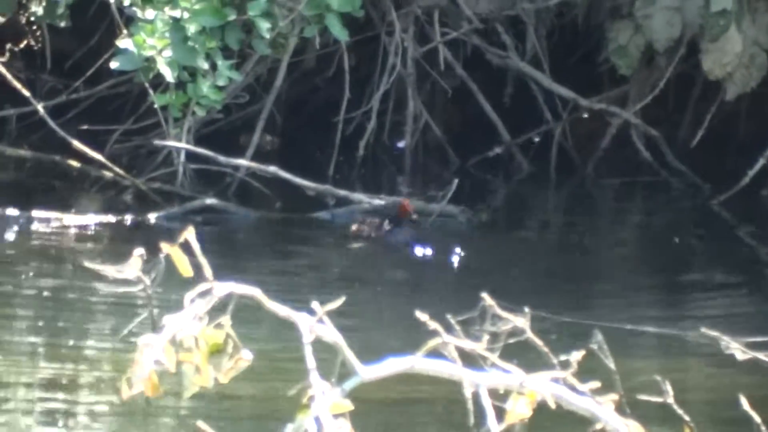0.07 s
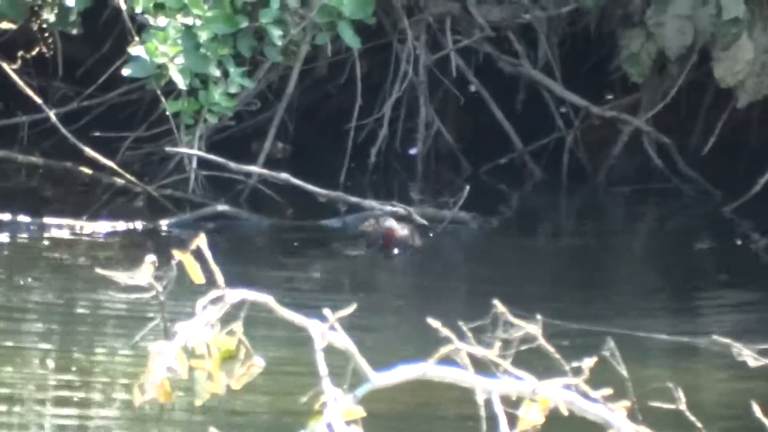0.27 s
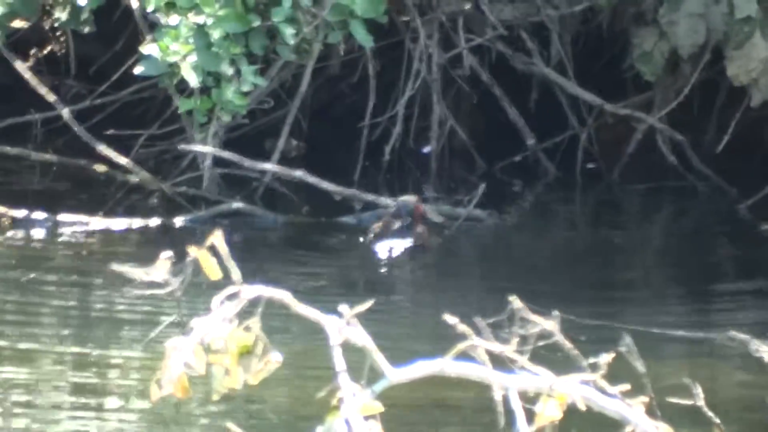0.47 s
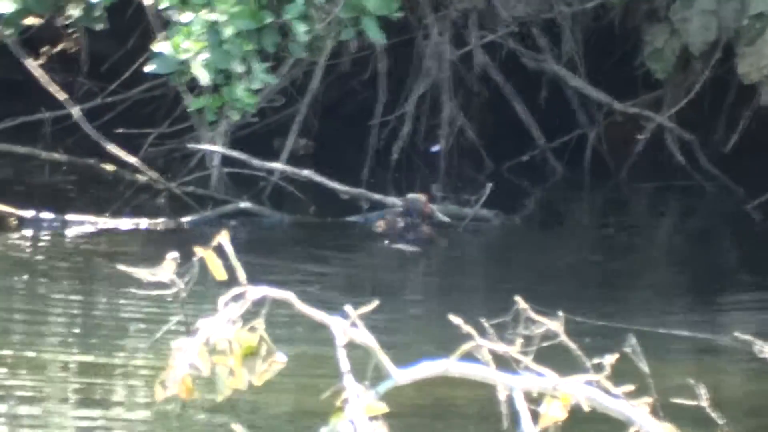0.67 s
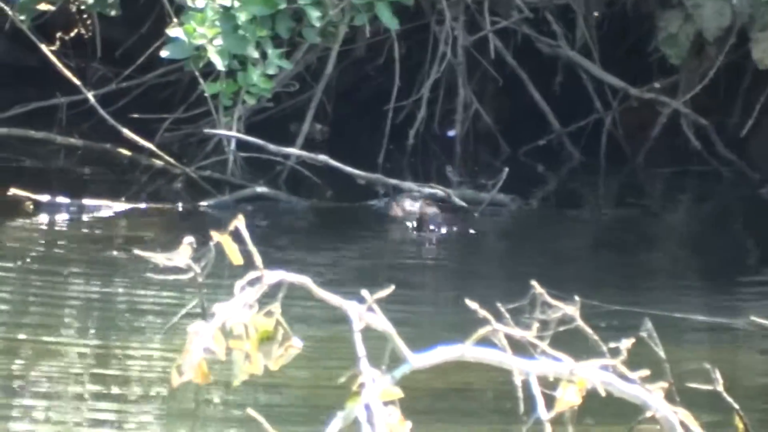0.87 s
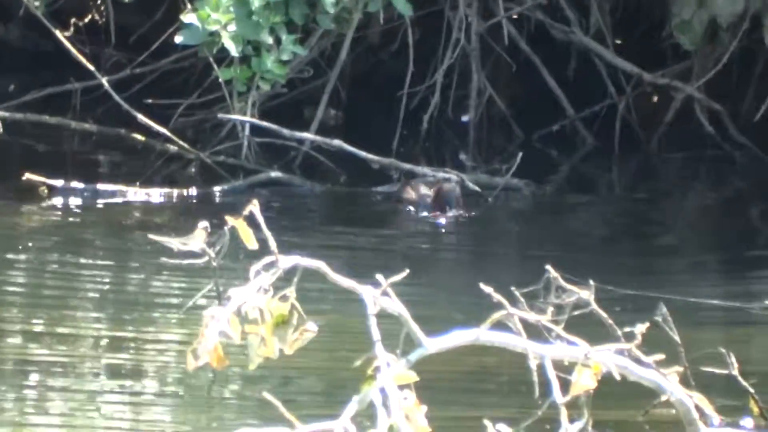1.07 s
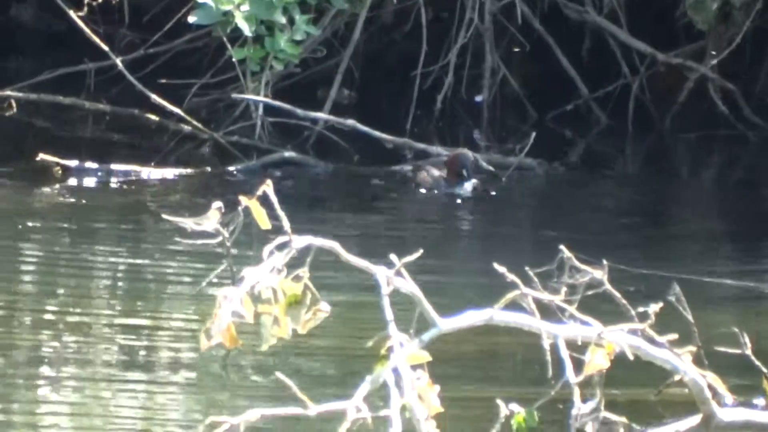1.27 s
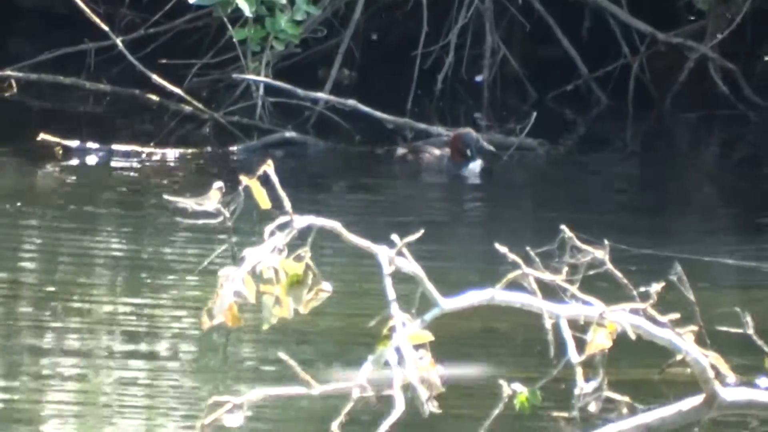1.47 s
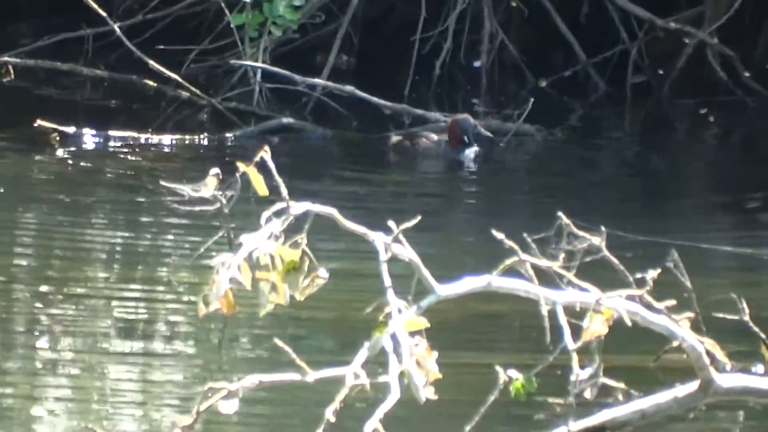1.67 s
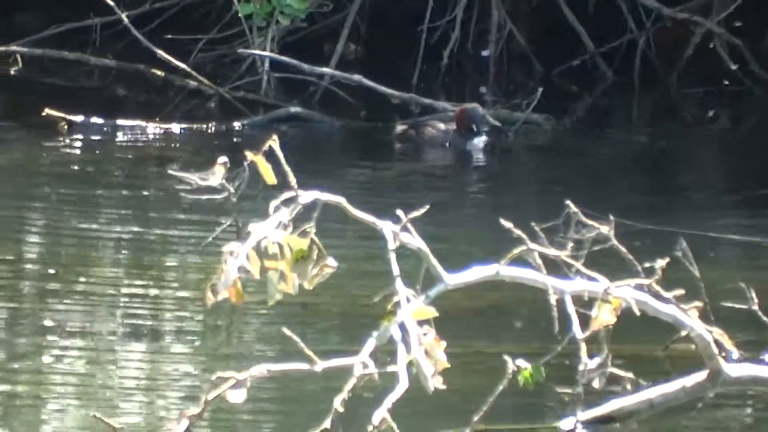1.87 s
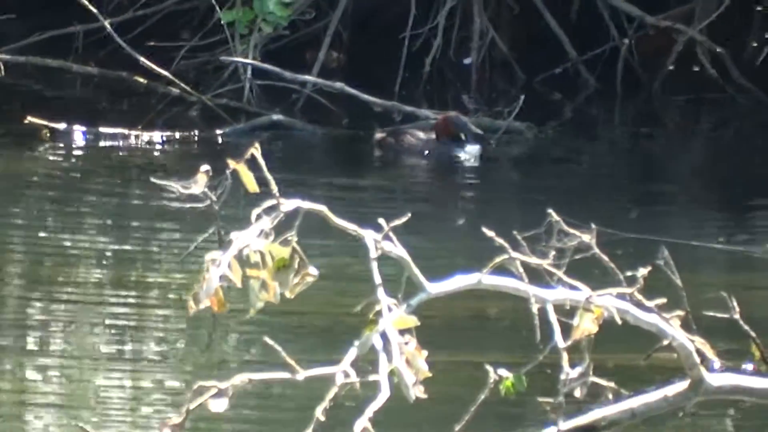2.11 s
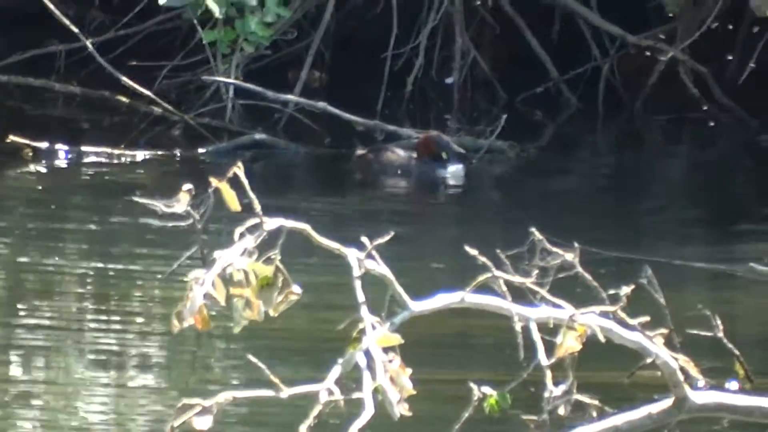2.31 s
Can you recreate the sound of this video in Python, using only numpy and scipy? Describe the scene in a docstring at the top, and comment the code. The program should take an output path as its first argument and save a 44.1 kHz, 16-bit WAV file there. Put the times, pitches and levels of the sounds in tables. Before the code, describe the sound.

Birdsong among trees: rising whistles, a buzzy trill, then a quick run of falling notes.

```python
"""A wooded river bank, heard through a stereo microphone with the nearer birds a little to the left.
One gives a rising whistle, and later another; between them a second bird swells into a buzzy trill
and breaks off. A run of falling notes follows, over a lower, fainter song and a brief soft hiss.
Far birds twitter in the trees. Bank and trees throw every call back, above a steady distant rumble
and a faint whine."""
import sys
import numpy as np
from scipy import signal
from scipy.fft import rfft, irfft
from scipy.io import wavfile

SR = 44100
rng = np.random.default_rng(int(sys.argv[2]) if len(sys.argv) > 2 else 0)


def wrap_up_sound(samples):
    """Save the sound to the file named by the first command line argument, as 16-bit audio."""
    columns = np.atleast_2d(samples).T
    # keep every value between -1 and 1, then stretch to whole-number steps
    tamed = np.clip(columns, -1, 1)
    steps = np.round(tamed * 32767).astype(np.int16)
    wavfile.write(sys.argv[1], SR, steps)


N = 108045
TIME = np.arange(N) / SR


def amp(db):
    """Decibels to gain."""
    return 10 ** (np.asarray(db) / 20)


def unit(x):
    """Scales to rms 1."""
    return x / np.sqrt(np.mean(x ** 2) + 1e-20)


def curve(rows, t, column=1):
    """One column of a time table, joined by straight lines."""
    return np.interp(t, np.array(rows)[:, 0], np.array(rows)[:, column])


def spectrum(rows, hz):
    """A frequency table, joined on a log axis."""
    f, value = np.transpose(rows)
    return np.interp(np.log(hz + 1), np.log(f + 1), value)


def add(mix, start_s, sound):
    """Mixes a sound in at start_s."""
    at = round(start_s * SR)
    sound = sound[max(-at, 0):]
    part = mix[max(at, 0):][:len(sound)]
    part += sound[:len(part)]


def wander(size, hz):
    """Smooth random drift of rms near 1, up to about hz."""
    lowpass = np.exp(-.5 * (np.fft.rfftfreq(N, 1 / SR) / hz) ** 2)
    return unit(irfft(rfft(rng.standard_normal(N)) * lowpass, N))[:size]


def phase(hz):
    """Running phase of a pitch curve."""
    return 2 * np.pi * np.cumsum(hz) / SR


# Likeness of the microphone's two channels: frequency_hz, likeness (0-1)
AIR_LIKENESS = [(60, 0.96), (130, 1), (250, 0.88), (500, 0.89), (1200, 0.51), (2500, 0.77), (5000, 0.94),
                (12000, 1)]
# Lean of the left channel over the right: frequency_hz, left_db
AIR_LEAN = [(200, 0), (700, 0.79), (1500, 2.8), (3500, 0.8), (8000, 0)]

def air(colour):
    """Stereo noise of a given colour, widest in the midrange."""
    hz = np.fft.rfftfreq(N, 1 / SR)
    mid, side = rfft(rng.standard_normal((2, N)))
    likeness, left_db = spectrum(AIR_LIKENESS, hz), spectrum(AIR_LEAN, hz)
    mid *= np.sqrt(1 + likeness)
    side *= np.sqrt(1 - likeness)
    channels = np.array([(mid + side) * amp(left_db / 2), (mid - side) * amp(-left_db / 2)])
    return unit(irfft(channels * amp(spectrum(colour, hz)), N))


# Colour of the distant rumble: frequency_hz, density_db
RUMBLE_COLOUR = [(20, -27), (40, -14), (80, -3), (140, -6), (215, 0), (290, -4), (370, -13), (520, -16),
                 (720, -12), (950, -20), (1300, -23), (1550, -19), (1850, -22), (2300, -28), (3000, -28),
                 (4500, -45), (12000, -90)]
# Its level at the microphone: time_s, level_db
RUMBLE_LEVEL = [(0, -51.5), (.7, -51.5), (1.1, -49.5), (1.45, -48.5), (1.75, -50), (2.45, -49.5)]

def rumble():
    """Low, nearly steady noise from far off."""
    return amp(curve(RUMBLE_LEVEL, TIME)) * air(RUMBLE_COLOUR)


# Colour of the far chorus: frequency_hz, density_db
CHORUS_COLOUR = [(1800, -33), (2500, -10), (3200, 9), (4600, 11.5), (5800, 5), (7500, 1.5), (8500, -8),
                 (10000, -21), (12000, -30.5), (15500, -41.5)]
# Its level at the microphone: time_s, level_db
CHORUS_LEVEL = [(0, -54), (.5, -50), (.8, -56.5), (1.1, -50.5), (1.5, -52.5), (1.8, -55), (2.05, -58),
                (2.45, -59.5)]

def far_chorus():
    """Birds so distant that they blur into a wash of treble noise."""
    return amp(curve(CHORUS_LEVEL, TIME)) * air(CHORUS_COLOUR)


# Faint tones in the centre: pitch_hz, level_db
WHINE_TONES = [(1473, -71.5), (1573, -67.5)]

def whine():
    """Two steady tones whose pitch barely drifts."""
    return sum(amp(db) * unit(np.sin(phase(hz + .5 * wander(N, 2.15)))) for hz, db in WHINE_TONES)


# Calls far back in the trees: start_s, length_s, from_hz, to_hz, flutter_hz, level_db
TWITTER_NOTES = [(-.02, 0.062, 4930, 5000, 60, -56.5), (-.02, 0.065, 2915, 2632, 215, -53),
                 (.07, .04, 5690, 6200, 298, -45), (0.112, 0.062, 4300, 4340, 25, -49.5),
                 (0.134, 0.0494, 4366, 4660, 80, -45), (.05, 0.041, 3110, 3500, 120, -65),
                 (0.107, 0.048, 7395, 7380, 58.6, -45), (.295, 0.021, 4980, 5000, 30.3, -36),
                 (0.317, 0.08, 4240, 4307, 378, -46.5), (0.381, .36, 4305, 4450, 511, -47.5),
                 (0.388, 0.23, 7720, 7550, 200, -65), (0.298, 0.43, 6680, 6300, 540, -59),
                 (0.678, 0.039, 5320, 5000, 172, -40.5), (.71, 0.071, 2250, 2300, 60, -65),
                 (0.781, .06, 5540, 5100, 173, -51), (0.831, 0.085, 6340, 7300, 297, -56),
                 (0.921, 0.19, 7220, 7500, 174, -53.5), (1.009, 0.068, 8150, 8100, 260, -52),
                 (1.103, 0.048, 5920, 5850, 69, -45), (1.127, 0.13, 7250, 7120, 81.5, -52.5),
                 (1.286, 0.062, 6170, 5950, 93, -51), (1.336, .13, 7440, 7550, 182, -50.5),
                 (1.438, 0.17, 7040, 7250, 260, -54), (1.392, 0.13, 4680, 4900, 492, -51),
                 (1.609, .075, 4850, 5530, 130, -51), (1.694, 0.14, 6850, 6300, 587, -59),
                 (2.184, 0.14, 4500, 4410, 400, -54), (2.33, .06, 5220, 6100, 510, -56),
                 (2.415, 0.071, 6500, 6550, 50, -59), (2.394, 0.054, 4170, 4100, 250, -53)]

def twitters(fade_s=.027):
    """Far birds: thin notes whose pitch flutters quickly."""
    out = np.zeros(N)
    for start, length, from_hz, to_hz, flutter_hz, db in TWITTER_NOTES:
        progress = np.linspace(0, 1, round(length * SR))
        hz = from_hz + (to_hz - from_hz) * progress + flutter_hz * wander(len(progress), 231)
        fade = np.minimum(np.minimum(progress, 1 - progress) * length / fade_s, 1)
        add(out, start, amp(db) * unit(np.sin(phase(hz))) * fade)
    return out


# A nearer bird to the left, one list per whistle: time_s, pitch_hz, level_db
WHISTLE_NOTES = [
    [(.19, 3240, -60), (.215, 3350, -47), (.236, 3440, -40), (.256, 3510, -31), (.291, 3620, -28.5),
     (.304, 3520, -42)],
    [(1.73, 3300, -55), (1.755, 3420, -43), (1.777, 3450, -31.5), (1.816, 3540, -28.3), (1.828, 3560, -33),
     (1.838, 3510, -44)],
]

def whistles(waver_hz=14, release_s=.0035):
    """Nearly pure notes that rise, swell and stop short."""
    out = np.zeros(N)
    for note in WHISTLE_NOTES:
        t = np.arange(note[0][0], note[-1][0], 1 / SR)
        angle = phase(curve(note, t) + waver_hz * wander(len(t), 80))
        tone = np.sin(angle) + amp(-32) * np.sin(2 * angle) + amp(-46) * np.sin(3 * angle)
        release = np.clip((t[-1] - t) / release_s, 0, 1)
        add(out, t[0], unit(tone) * amp(curve(note, t, column=2)) * release)
    return out


# Swell of the trill, from a nearer bird just left of centre: time_s, level_db
BUZZ_LEVEL = [(.74, -55.5), (.84, -45), (.9, -41), (.98, -39), (1.07, -35.5), (1.15, -32), (1.25, -32.5),
              (1.313, -31.5), (1.342, -38.5), (1.356, -30), (1.378, -48.5)]
# Its pitch swings: time_s, rate_hz, centre_hz, depth_hz
BUZZ_SWING = [(.74, 260, 3900, 400), (.9, 204, 3941, 510), (1.02, 208, 4013, 557), (1.15, 162, 4082, 530),
              (1.24, 168, 4010, 503), (1.31, 177, 4058, 454), (1.378, 140, 4040, 434)]

def buzz(rate_jitter=.03, shimmer_db=1.5, downstroke_db=1.5, release_s=.0015):
    """A whistle swung up and down some 200 times a second, louder going down, slowing as it swells."""
    t = np.arange(BUZZ_LEVEL[0][0], BUZZ_LEVEL[-1][0], 1 / SR)
    rate_hz, centre_hz, depth_hz = (curve(BUZZ_SWING, t, column) for column in (1, 2, 3))
    level_db = curve(BUZZ_LEVEL, t)
    from_peak_db = level_db - level_db.max()
    cycle = phase(rate_hz * (1 + rate_jitter * wander(len(t), 90)))
    swing = np.sin(cycle + .2 * np.sin(cycle)) - .12 * np.cos(2 * cycle)  # a lopsided sine
    rasp_hz = 50 * amp(-.7 * from_peak_db)  # hoarser when soft
    angle = phase(centre_hz + depth_hz * swing + rasp_hz * wander(len(t), 300))
    third_db = -37.5 + 6.5 * swing + from_peak_db  # brighter when high and loud
    tone = np.sin(angle) + amp(-33.5) * np.sin(2 * angle) + amp(third_db) * np.sin(3 * angle)
    throb_db = shimmer_db * wander(len(t), 110) - swing - downstroke_db * np.cos(cycle)
    release = np.clip((t[-1] - t) / release_s, 0, 1)
    out = np.zeros(N)
    add(out, t[0], unit(tone * amp(throb_db)) * amp(level_db) * release)
    return out


def glides(notes, taper):
    """Short sliding notes, loudest halfway; a higher taper narrows the swell."""
    out = np.zeros(N)
    for start, length, from_hz, to_hz, db in notes:
        progress = np.linspace(0, 1, round(length * SR))
        hz = from_hz * (to_hz / from_hz) ** progress * (1 + .011 * wander(len(progress), 54))
        swell = abs(np.sin(np.pi * progress)) ** taper
        add(out, start, amp(db) * np.sqrt(2) * swell * np.sin(phase(hz)))
    return out


# A faint song among the trees, further left: start_s, length_s, from_hz, to_hz, level_db
LOW_SONG_NOTES = [(1.345, 0.049, 2205, 1480, -61.5), (1.52, 0.048, 2168, 1496, -58.5),
                  (1.692, .052, 2300, 1486, -56.5), (1.868, 0.054, 2300, 1473, -56),
                  (2.047, 0.029, 2653, 1390, -53), (2.082, .018, 2324, 1465, -57),
                  (2.113, 0.0212, 2290, 1560, -54), (2.144, 0.017, 2215, 1570, -54),
                  (2.175, 0.0183, 2450, 1440, -52.5), (2.205, 0.0171, 2460, 1600, -50.5),
                  (2.235, 0.016, 2280, 1530, -62), (2.264, 0.014, 2110, 1460, -61)]

def low_song():
    """Four downward slurs that break into a quick closing rattle."""
    return glides(LOW_SONG_NOTES, taper=1.08)


# A higher run among the trees: start_s, length_s, from_hz, to_hz, level_db
FALLING_NOTES = [(1.684, .037, 4100, 2480, -44.5), (1.764, .032, 3900, 2520, -46.5),
                 (1.839, .034, 3950, 2500, -46), (1.915, .029, 3900, 2780, -43.5),
                 (1.987, .035, 3950, 2520, -41.5), (2.064, .033, 3920, 2650, -41),
                 (2.142, .038, 3980, 2500, -40.5), (2.232, .036, 3930, 2520, -40.5)]

def falling_run():
    """Eight quick notes, each sliding steeply down."""
    return glides(FALLING_NOTES, taper=1.8)


# Colour of the hiss behind the last notes: frequency_hz, density_db
HISS_COLOUR = [(2500, -34), (5000, -2), (8000, -9), (11000, -13), (13000, -29), (16000, -35)]

def hiss(start_s=1.985, length_s=.12, level_db=-68.5):
    """A soft puff of treble noise that rises fast and fades away."""
    progress = np.clip((TIME - start_s) / length_s, 0, 1)
    return amp(level_db) * np.minimum(progress * 10, 1) * (1 - progress) * air(HISS_COLOUR)


# Echoes off the bank, relative to the direct call before echo_db is added: delay_s, level_db
BANK_ECHOES = [(.0014, -10), (.0033, -13), (.0087, -14), (.0235, -13), (.051, -16)]

def woods(call, echo_db, tail_db, t60_s, left_db, tail_width=.17, build_s=.0062):
    """The path to the microphone: direct sound, echoes off the bank and a tail scattered by trees."""
    t = np.arange(SR) / SR
    scatter = rng.standard_normal((2, SR)) * amp(-60 * t / t60_s) * (1 - np.exp(-t / build_s))
    mid, side = amp(tail_db) * scatter / np.linalg.norm(scatter[0])
    mid[0] += 1  # direct sound
    for delay, db in BANK_ECHOES:
        add(mid, delay, amp([db + echo_db]))
    response = np.array([mid + tail_width * side, mid - tail_width * side]) / np.linalg.norm(mid)
    pan = amp([[left_db / 2], [-left_db / 2]])
    return signal.fftconvolve(call[None], response, axes=1)[:, :N] * pan


def scene():
    """Each bird at its own depth among the trees: the farther off, the more of it is tail."""
    return (rumble() + far_chorus() + whine()
            + woods(twitters(), echo_db=-7, tail_db=-.5, t60_s=.53, left_db=1)
            + woods(whistles(), echo_db=-1, tail_db=-10.5, t60_s=.45, left_db=3)
            + woods(buzz(), echo_db=-.5, tail_db=-8, t60_s=.28, left_db=1.3)
            + woods(low_song(), echo_db=-11.5, tail_db=-2, t60_s=.51, left_db=5)
            + woods(falling_run(), echo_db=-30, tail_db=-2, t60_s=.53, left_db=2.2)
            + hiss())


def record(dry):
    """The recorder's band limit: a steep cut of the highest treble."""
    cutoff_hz = 15600
    lowpass = signal.firwin(511, cutoff_hz, window=("kaiser", 9), fs=SR)
    return signal.oaconvolve(dry, lowpass[None], "same")


dry = scene()
out = record(dry)
wrap_up_sound(out)
```